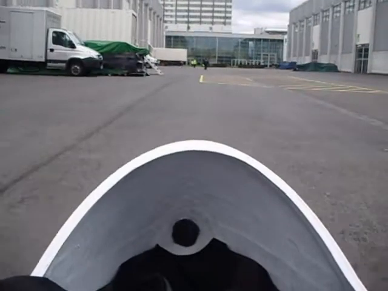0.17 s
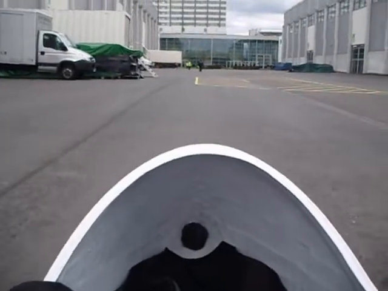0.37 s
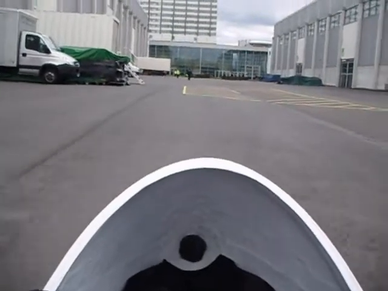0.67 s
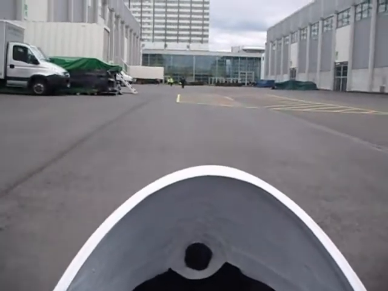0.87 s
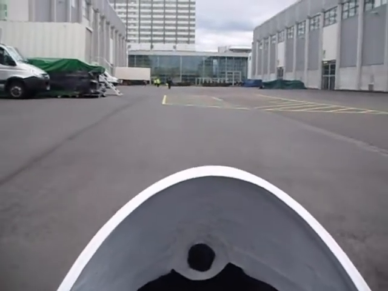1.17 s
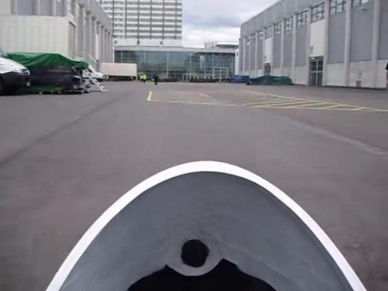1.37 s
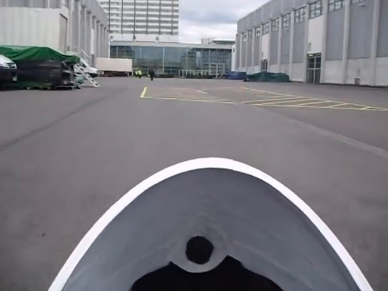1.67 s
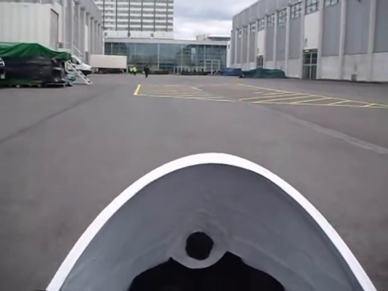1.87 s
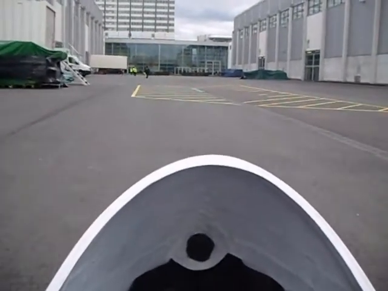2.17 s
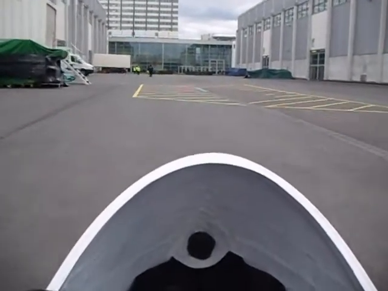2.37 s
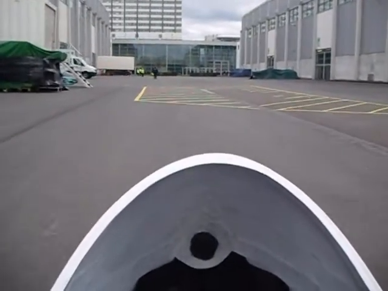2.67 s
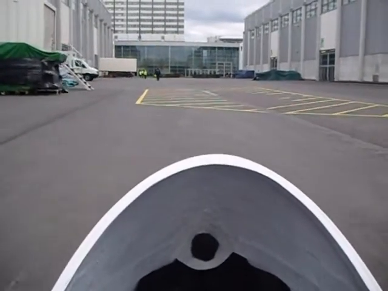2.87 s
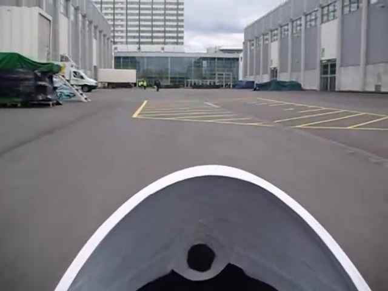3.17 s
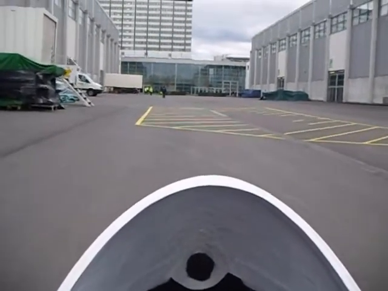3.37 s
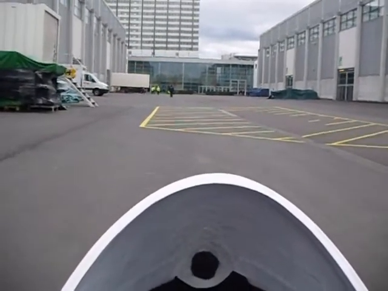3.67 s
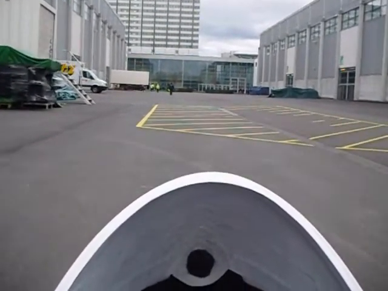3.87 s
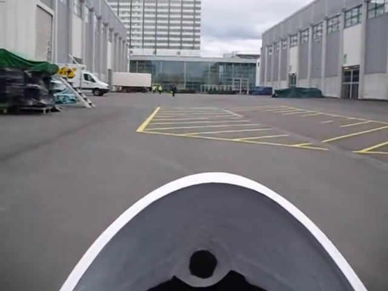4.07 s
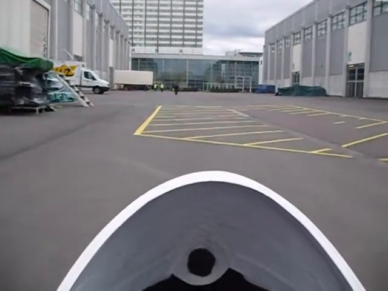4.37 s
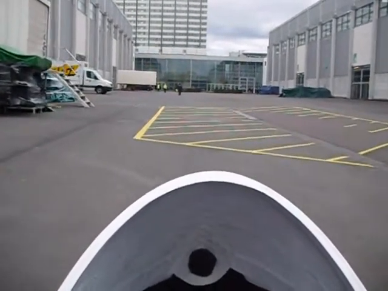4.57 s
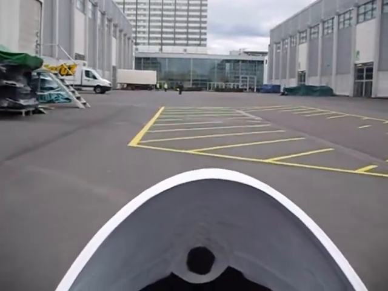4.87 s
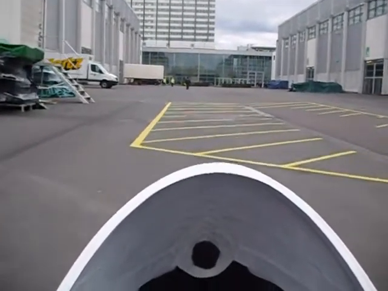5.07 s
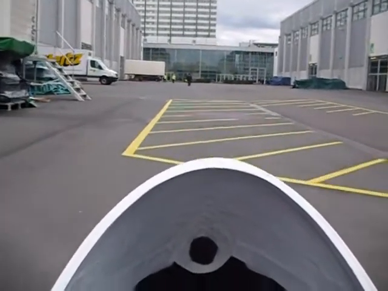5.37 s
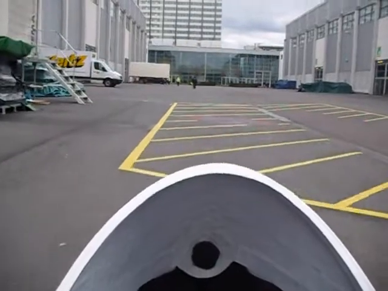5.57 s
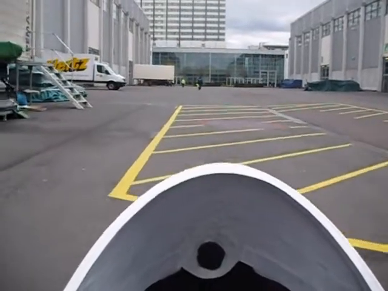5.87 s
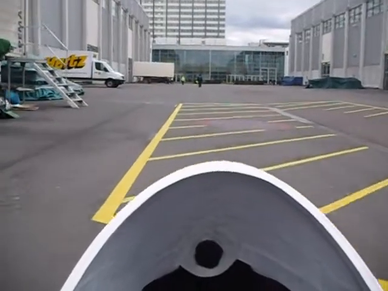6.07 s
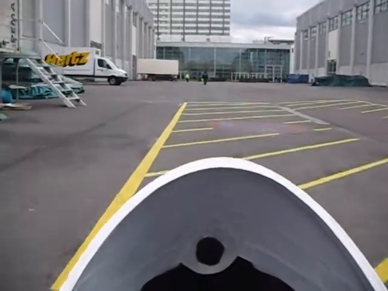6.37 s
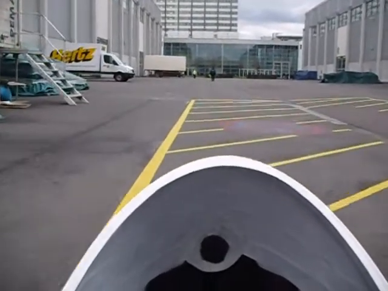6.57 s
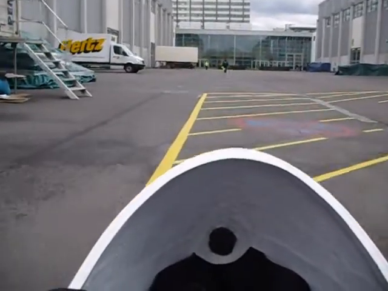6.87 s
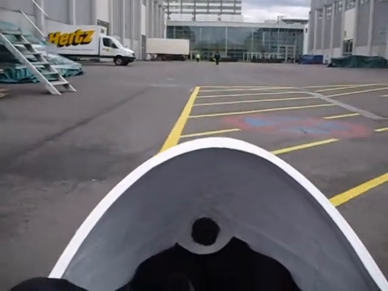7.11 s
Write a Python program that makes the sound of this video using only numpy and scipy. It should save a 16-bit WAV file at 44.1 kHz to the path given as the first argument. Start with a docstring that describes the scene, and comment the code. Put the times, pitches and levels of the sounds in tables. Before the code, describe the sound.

Outdoor ride on a small electric vehicle: soft motor hum, rumbling wind, a burst of sharp wind pops, scratchy brake rubs and a short closing squeal.

```python
"""On the seat of a small electric vehicle rolling over asphalt, with one microphone close to the wind.
Behind everything lies a hiss of tyres and microphone, shaped noise at a steady level. Wind rumbles and
rushes as noise under level curves, and eddies pop as short pressure swings. The motor hums with a few
harmonics while it pulls. In front a brake pad grazes its disc in short scuffs, noise ringing the disc's
modes, until it grips and squeals in wavering harmonics."""
import sys
import numpy as np
from scipy import signal
from scipy.fft import rfft, irfft, next_fast_len
from scipy.io import wavfile
from scipy.ndimage import uniform_filter1d

SR = 44100
rng = np.random.default_rng(int(sys.argv[2]) if len(sys.argv) > 2 else 0)


def to_wav(s):
    """Save 16-bit WAV."""
    ch = np.atleast_2d(s).T  # columns
    pcm = np.round(np.clip(ch, -1, 1) * 32767)  # PCM
    wavfile.write(sys.argv[1], SR, pcm.astype(np.int16))


N = 319284   # length in samples


def amp(db):
    """Level in dB to gain."""
    return 10 ** (np.asarray(db) / 20)


def rms_one(x):
    """Scale to rms 1."""
    return x / np.sqrt(np.mean(x ** 2) + 1e-20)


def in_time(rows):
    """Interpolate the columns of a curve table, t/s first, at every sample."""
    s, *columns = np.transpose(rows)
    return [np.interp(np.arange(N) / SR, s, column) for column in columns]


def span(start, length, edge):
    """Window from 0 to 1 and back, with straight edges centred on its start and end; all in seconds."""
    t = np.arange(N) / SR - start
    return np.clip(np.minimum(t, length - t) / edge + .5, 0, 1)


def coloured(spectrum):
    """Noise shaped by a spectrum table, its dB joined by straight lines over log frequency; rms 1."""
    size = next_fast_len(N)
    hz = np.maximum(np.arange(size // 2 + 1) * SR / size, 1)
    points = np.array(spectrum)
    gain = amp(np.interp(np.log(hz), np.log(points[:, 0]), points[:, 1]))
    shaped = irfft(rfft(rng.standard_normal(size)) * gain, size)
    return rms_one(shaped[:N])


def drift(rate_hz):
    """Slow random wander of rms 1: noise through two equal low-pass poles, run at every 40th sample."""
    r = np.exp(-2 * np.pi * rate_hz * 40 / SR)
    white = rng.standard_normal(N // 40 + 2002)
    slow = signal.lfilter([1], [1, -2 * r, r * r], white)[2000:]   # the filter settles first
    return np.interp(np.arange(N) / 40, np.arange(len(slow)), rms_one(slow))


def resonance(x, hz, width_hz):
    """Two-pole peak, gain about 1 on top."""
    r = np.exp(-np.pi * width_hz / SR)
    zeros = np.array([1, 0, -1]) * (1 - r * r) / 2
    poles = [1, -2 * r * np.cos(2 * np.pi * hz / SR), r * r]
    return signal.lfilter(zeros, poles, x)


# spectrum of tyres and microphone: [f/Hz, relative level/dB per Hz]
HISS_SPECTRUM = [(500, 2.5), (1100, 17), (1700, 5), (2500, 7), (3200, 1.5), (5000, -0.5), (13000, -6),
                 (15000, -5)]
HISS_DB = -60.5


def tyre_and_microphone_hiss():
    """Many tiny random impulses of tread and microphone add up to a steady shaped noise."""
    return amp(HISS_DB) * coloured(HISS_SPECTRUM)


# wind and road before buffets and flicker: [t/s, rumble level/dB, steady rush level/dB]
WIND = [(0.0, -39, -50.5), (0.28, -42, -49), (0.36, -38.5, -42.5), (0.7, -34, -42.5), (1.1, -38, -43.5),
        (1.3, -30, -42), (1.36, -39.5, -47.5), (2.0, -38, -47), (2.74, -36.5, -46.5), (3.45, -37, -44.5),
        (3.7, -33, -42.5), (3.9, -28, -42), (4.12, -39, -46), (5.0, -36, -44.5), (5.35, -30, -40),
        (5.65, -26.5, -36.5), (5.9, -25, -35.5), (6.02, -32.5, -43), (6.25, -34, -46.5), (6.6, -31, -43.5),
        (7.24, -36.5, -42)]
# spectrum of the low rumble: [f/Hz, relative level/dB per Hz]
RUMBLE_SPECTRUM = [(12, -29), (20, 4), (93, -1), (124, -4), (157, -5), (200, -9.5), (260, -41), (440, -120)]
# spectrum of the rushing air: [f/Hz, relative level/dB per Hz]
RUSH_SPECTRUM = [(120, -33.5), (200, 6), (300, -1), (350, 1.5), (410, -4.5), (800, -13.5), (1400, -29),
                 (2400, -40), (4000, -52.5), (8000, -56.5)]
# buffets, brief swells and a few dips of the wind: [t/s, rise in level/dB]
BUFFETS = [(.12, 3), (.81, 9), (1.17, 5.5), (1.28, 1.5), (1.67, 3), (2.8, 1.5), (2.94, 7.5), (3.12, 16.5),
           (3.29, 4), (3.66, 8.5), (3.75, 9.5), (4.05, 4), (4.56, 8), (4.66, 4.5), (4.84, 6), (5.17, -6),
           (5.24, 0.5), (5.93, 3), (6.33, 8), (6.77, -3), (6.94, 6)]
BUFFET_S = 0.039   # from the peak to 1/e of the rise
# share of a buffet's rise that the rush and the deepest rumble take; the deepest lies below DEEP_HZ
RUSH_FOLLOWS, DEEP_FOLLOWS, DEEP_HZ = 0.39, 0.35, 70


def wind():
    """Low turbulent rumble on the microphone and the rush of air round the shell, partly lumpy."""
    rumble_db, rush_db = in_time(WIND)
    t = np.arange(0, N / SR, .002)
    buffets_db = sum(db * np.exp(-((t - s) / BUFFET_S) ** 2) for s, db in BUFFETS)
    rise_db, = in_time(np.c_[t, buffets_db])

    low = coloured(RUMBLE_SPECTRUM)
    deep = signal.sosfiltfilt(signal.butter(2, DEEP_HZ, fs=SR, output="sos"), low)
    buffeted = amp(rise_db) * (low - deep) + amp(DEEP_FOLLOWS * rise_db) * deep
    rumble = amp(rumble_db + 2.04 * drift(10)) * buffeted

    steady = coloured(RUSH_SPECTRUM)
    lumpy = amp(-6 + 4 * drift(20)) * coloured(RUSH_SPECTRUM)
    return rumble + amp(rush_db + RUSH_FOLLOWS * rise_db) * (steady + lumpy)


def pop(swing_db, flutter_hz, push_db, phase):
    """A sharp pressure swing that flutters out in about two cycles, riding on a slower push."""
    t = np.arange(-.005, .015, 1 / SR)
    cycles = t * flutter_hz
    rise, decay = np.exp(-(cycles / .4) ** 2), np.exp(-np.abs(cycles / .9) ** 1.25)
    swing = np.where(t < 0, rise, decay) * np.cos(2 * np.pi * cycles + phase)
    # the push is followed by a weaker, longer rebound
    push = np.exp(-(t / 0.0007) ** 2) - 0.27 * np.exp(-((t - .004) / 0.0039) ** 2)
    return amp(swing_db) * swing + np.sign(np.cos(phase)) * amp(push_db) * push


# gusts that break into small pops: [start t/s, length t/s, pops per s, middle swing level/dB]
GUSTS = [(3.6, .25, 30, -42), (5.15, .25, 25, -42), (5.4, .56, 120, -29.5), (5.97, .2, 35, -33),
         (6.3, .12, 30, -30), (6.68, .13, 30, -41)]
GUST_EDGE_S = .04
# strong wind pops at the microphone: [t/s, swing level/dB, flutter f/Hz]
STRONG_POPS = [(3.1366, -41, 665), (3.7439, -30, 764), (3.7544, -26, 487), (3.7743, -43, 650),
               (3.823, -37, 702), (5.1578, -30, 830), (5.1738, -36, 810), (5.2458, -33, 610),
               (5.3384, -30, 710), (5.4057, -31, 730), (5.411, -32, 740), (5.4436, -25, 800),
               (5.4497, -25, 974), (5.4625, -23.5, 970), (5.4917, -24, 650), (5.516, -28, 710),
               (5.564, -34, 730), (5.6059, -28, 810), (5.6524, -27, 665.4), (5.657, -18, 725),
               (5.7314, -21.5, 1550), (5.7369, -20.5, 1010), (5.7573, -37, 810), (5.772, -21, 810),
               (5.7953, -27, 770), (5.8129, -20.5, 920), (5.8308, -25, 940), (5.872, -25, 818.5),
               (5.8854, -21.5, 735), (5.9437, -18, 730), (6, -45, 700), (6.044, -31, 820),
               (6.0589, -25.5, 820), (6.1072, -29, 696), (6.113, -13, 1010), (6.118, -18, 1100),
               (6.1359, -28, 840), (6.3404, -27, 570), (6.7232, -32, 734), (6.7777, -34, 998)]
# slow push under a strong pop of -24.9 dB, its share of the swing's level, full random range in dB
PUSH_DB, PUSH_FOLLOWS, PUSH_SPREAD_DB = -15, 0.13, 12
# short dull crackle sprayed by each pop: level against the swing, decay time, low-pass corner
CRACK_RE_DB, CRACK_S, CRACK_HZ = -14.5, 0.0023, 2490


def pops():
    """Eddies hit the microphone: strong ones from the table, small ones at random in the gusts."""
    rows = []   # t/s, swing level/dB, flutter f/Hz, push level/dB, phase/turns
    chance, luck = rng.random(N), rng.random((N // 64 + 1, 4))
    for start, length, per_s, db in GUSTS:
        small = np.flatnonzero(chance < per_s * span(start, length, GUST_EDGE_S) / SR)
        for i in small:
            a, b, c, d = luck[i // 64]
            rows.append((i / SR, db + 12 * (a - .5), 380 * 2.18 ** b, db + 8 * c, d))
    for row, (c, d) in zip(STRONG_POPS, rng.random((len(STRONG_POPS), 2))):
        push_db = PUSH_DB + PUSH_FOLLOWS * (row[1] + 24.9) + PUSH_SPREAD_DB * (c - .5)
        rows.append((*row, push_db, d))

    swings, strikes = np.zeros(N + SR), np.full(N, 1e-18)
    for s, swing_db, hz, push_db, turns in rows:
        at = round(s * SR)
        strikes[at] = amp(swing_db + CRACK_RE_DB)
        shape = pop(swing_db, hz, push_db, 2 * np.pi * turns)
        swings[at:at + len(shape)] += shape
    swings = swings[round(.005 * SR):][:N]   # each pop was laid in 5 ms late, for its lead-in

    fading = signal.lfilter([1], [1, -np.exp(-1 / (CRACK_S * SR))], strikes)
    spray = fading * rng.standard_normal(N)
    crackle = signal.sosfilt(signal.butter(4, CRACK_HZ, fs=SR, output="sos"), spray)
    return swings + crackle


# motor speed, before a slight waver: [t/s, hum f/Hz]
SPEED = [(0.3, 219.7), (.45, 228), (.9, 243.8), (1.3, 262.7), (2.8, 228.7), (3.15, 237), (3.6, 243.4),
         (4.5, 244.1), (5.4, 247.3), (6.3, 249.7), (7.24, 253.2)]
# motor pull, one table per stretch under power, before waver: [t/s, hum level/dB, 3rd harmonic level/dB]
PULL = [
    [(0.33, -47, -68), (0.39, -37, -57), (0.442, -28.5, -69), (0.61, -33, -55), (0.678, -38, -43),
     (0.74, -29.5, -60), (0.85, -26, -57), (0.958, -23, -48.5), (1.076, -31.5, -48.5), (1.26, -32, -60),
     (1.3, -55, -69)],
    [(2.88, -47.5, -74), (3.12, -32.5, -53.5), (3.3, -38.5, -60), (3.45, -31, -61), (3.63, -32, -66),
     (3.68, -37.5, -71), (3.74, -27, -59), (4.42, -28.5, -58.5), (5.39, -29.5, -56.5), (5.46, -30.5, -72),
     (5.94, -33, -71), (6.05, -28.5, -52), (6.2, -29.5, -54.5), (6.69, -32, -51), (6.79, -27.5, -67),
     (6.86, -39.5, -74), (7.24, -35, -74)],
]
# 4th harmonic against the 3rd: [level/dB], one entry per stretch
FOURTH_RE_THIRD_DB = [-8.5, -10]
SECOND_DB, SECOND_FOLLOWS = -49.5, 0.72   # 2nd harmonic at a hum of -30 dB, its share of the hum's swing


def motor():
    """The hum and its harmonics follow the motor's turning, wavering a little, only while it pulls."""
    hum_hz = in_time(SPEED)[0] * (1 + 0.0048 * drift(13.2))
    turn = 2 * np.pi * np.cumsum(hum_hz) / SR
    out = np.zeros(N)
    for rows, fourth_re_third_db in zip(PULL, FOURTH_RE_THIRD_DB):
        hum_db, third_db = in_time(rows)
        second_db = SECOND_DB + SECOND_FOLLOWS * (hum_db + 30)
        tone = amp(hum_db + 0.78 * drift(29)) * np.sin(turn)
        for multiple, db in enumerate([second_db, third_db, third_db + fourth_re_third_db], start=2):
            level = amp(db + 3 * drift(18))
            tone = tone + level * np.sin(multiple * turn + .4 * drift(14))
        start, end = rows[0][0], rows[-1][0] + 0.033
        out += span(start, end - start, 0.042) * np.sqrt(2) * tone   # root 2: levels are rms
    return out


# pad on disc: [t/s, length/ms, ringing drive level/dB, hiss level/dB], before flicker and grip
SCUFFS = [(0.021, 14, -60, -55.5), (0.149, 4.3, -61, -64), (0.166, 6.8, -72, -62), (0.37, 6.4, -50, -58.5),
          (0.407, 6, -53, -66), (0.433, 6.5, -54.5, -64), (0.478, 6.4, -58, -65), (0.513, 24, -55, -69),
          (0.606, 15.5, -53.5, -68), (0.634, 14, -51.5, -66), (0.786, 8.6, -47.5, -74),
          (0.832, 4.9, -47.5, -72), (0.865, 23, -50.5, -65), (0.957, 7.4, -52, -68), (0.984, 9, -54.5, -65),
          (1.008, 18, -49, -67), (1.056, 10, -49, -62), (1.08, 17, -55, -63), (1.109, 50, -51, -60.5),
          (1.243, 12.1, -54, -63), (1.271, 21, -64, -56), (1.346, 19.6, -53.5, -62),
          (1.455, 34, -51.5, -62), (1.51, 37, -54.5, -67), (1.586, 14, -55, -69), (1.623, 8.3, -52, -63),
          (1.659, 12.5, -52.5, -63), (1.716, 8, -50.5, -66), (1.744, 15, -46.5, -60),
          (1.857, 21, -50.5, -66), (1.906, 20, -47, -64), (1.944, 22, -46, -61), (1.978, 40, -45, -59),
          (2.029, 65, -48, -56.5), (2.095, 14.6, -50.5, -59), (2.178, 28, -60, -56),
          (2.203, 82, -46.5, -57), (2.304, 5.6, -41.5, -51.5), (2.359, 9.5, -46.5, -58.5),
          (2.466, 10, -52.5, -62), (2.486, 13, -58.5, -66), (3.845, 9.5, -51.5, -61),
          (4.112, 7.7, -46.5, -57.5), (4.178, 8.8, -51, -60), (4.212, 49, -49.5, -58),
          (4.273, 19, -47, -57), (4.578, 11, -51, -61.5), (4.66, 7.4, -46, -57), (4.679, 13, -46.5, -56),
          (4.708, 9.5, -52, -63), (4.729, 11.3, -47.5, -57), (5.078, 5.5, -63, -63),
          (5.105, 9.3, -49.5, -68), (5.124, 7.5, -48.5, -62), (5.168, 15.7, -46.5, -58.5),
          (5.629, 6, -46, -57.5), (6.102, 15, -53, -64), (6.29, 5.5, -72, -62), (6.491, 21, -53.5, -57.5),
          (6.678, 26, -63, -60.5), (6.712, 124, -43.5, -52.5), (6.866, 285, -44, -54),
          (7.152, 60, -41.5, -51)]


def contact(column):
    """Pad pressure from one level column: each scuff bites fast and lets go a little slower."""
    touch = np.zeros(N)
    for row in SCUFFS:
        start, end = row[0], row[0] + row[1] / 1000
        touch[round(start * SR):round(end * SR)] = amp(row[column])
    release = np.exp(-1 / (.0022 * SR))   # time constant 2.2 ms
    held = signal.lfilter([1 - release], [1, -release], touch)
    return np.maximum(uniform_filter1d(touch, size=40), held)


# ringing modes of the disc: [f/Hz, nominal width/Hz, relative level/dB]
DISC = [(794, 126, 1.5), (1097, 54, 0.5), (1347, 98, 0), (1538, 69, -3.5), (1603, 32, -12.5),
        (1933, 69, -7.5), (2570, 290, -13), (2745, 59, -13), (3270, 62, -12.5), (3428, 170, -10),
        (5040, 170, -24.5), (5270, 160, -23), (6520, 130, -17), (7150, 320, -22.5), (7530, 49, -26.5)]
# spectrum of the rubbing hiss: [f/Hz, relative level/dB per Hz]
SCUFF_HISS = [(1800, -45), (3000, 2), (3600, -8), (3950, -7.5), (5000, -5), (7000, -1.5), (8000, -9),
              (11000, -8.5), (15000, -16.5)]
# the pad grips and squeals: [t/s, length t/s, first f/Hz, last f/Hz, level/dB]
SQUEALS = [(6.805, 0.031, 1705, 1700, -48), (6.944, 0.03, 1910, 1946, -39.5),
           (7.002, 0.0505, 1893, 2030, -41), (7.057, 0.098, 1953, 1885, -37.5)]
# harmonics of the squeal: [multiple of f, relative level/dB]
SQUEAL_TONES = [(1, -2.5), (2, -18), (3, -15.5), (4, -19), (5, -25.5), (6, -29), (7, -26)]
SQUEAL_EDGE_S, GRIP_RING_DB, GRIP_HISS_DB = .006, -12.5, -2   # a gripping pad rings and hisses less


def brake():
    """Friction rings the disc and hisses; when the pad grips it slips in a rough, pitched squeal."""
    grips = [span(s, length, SQUEAL_EDGE_S) for s, length, *_ in SQUEALS]
    grip = uniform_filter1d(np.clip(sum(grips), 0, 1), size=600)
    grain = amp(1.74 * drift(100))

    grit = contact(column=2) * amp(GRIP_RING_DB * grip) * grain * rng.standard_normal(N)
    rings = np.zeros(N)
    for hz, width, db in DISC:
        # each mode twice in a row: dark valleys between the bands
        once = resonance(grit, hz, 1.43 * width)
        twice = resonance(once, hz, 1.43 * width)
        # the rubbing spot moves, so modes swell in turn
        rings += amp(db + 2 * drift(15)) * twice

    hiss = contact(column=3) * amp(GRIP_HISS_DB * grip) * grain * coloured(SCUFF_HISS)

    glide = []
    for s, length, first, last, _ in SQUEALS:
        glide += [(s, first), (s + length, last)]
    pitch, = in_time(glide)
    rough_hz = pitch * (1 + .004 * drift(60) + .009 * drift(400))
    turn = 2 * np.pi * np.cumsum(rough_hz) / SR
    squeal = np.zeros(N)
    for k, db in SQUEAL_TONES:
        # higher harmonics flicker and blur more
        blur = .16 * (k - 1) * drift(250)
        squeal += amp(db + 0.7 * k * drift(35)) * np.sin(k * turn + blur)
    level = sum(amp(row[-1]) * on for row, on in zip(SQUEALS, grips))
    return amp(19) * rings + hiss + np.sqrt(2) * level * squeal


def scene():
    """From the steady hiss to the brake, everything reaches one microphone."""
    return (tyre_and_microphone_hiss() + wind() + pops() + motor() + brake())[None]


CUTOFF_HZ = 15300   # from here up the top is at least 70 dB down


def record(dry):
    """The microphone's lowest bass is thinned, the top is cut."""
    thin = signal.sosfilt(signal.butter(1, 30, "high", fs=SR, output="sos"), dry)
    return signal.sosfilt(signal.cheby2(18, 70, CUTOFF_HZ, fs=SR, output="sos"), thin)


dry = scene()
out = record(dry)
to_wav(out)
```